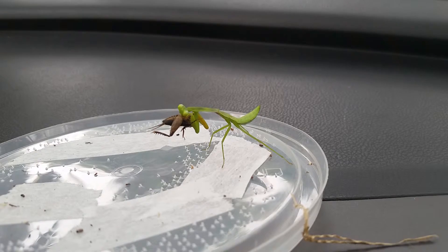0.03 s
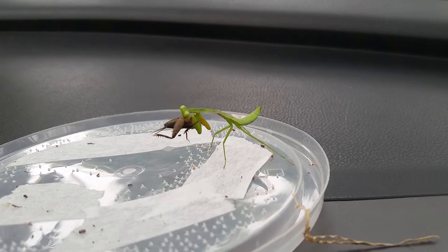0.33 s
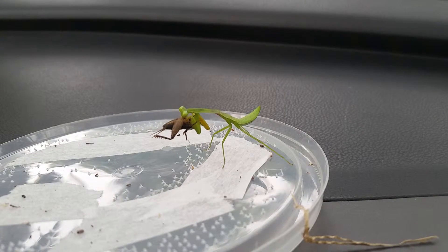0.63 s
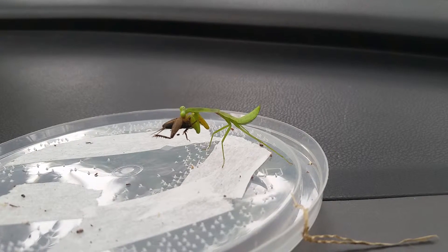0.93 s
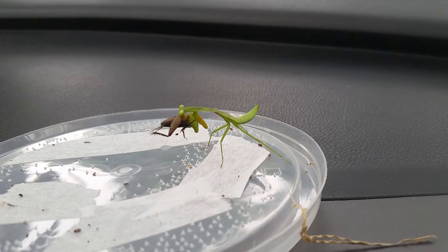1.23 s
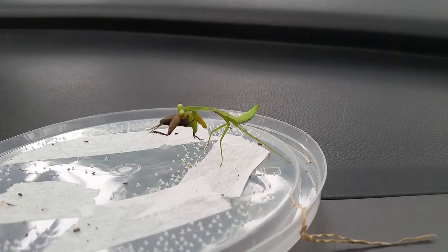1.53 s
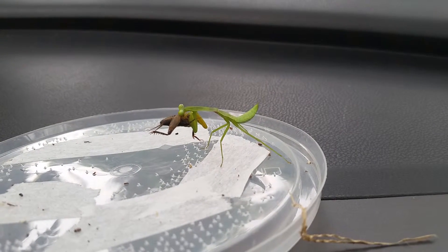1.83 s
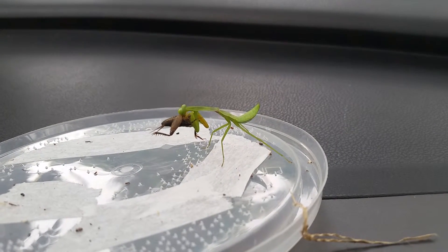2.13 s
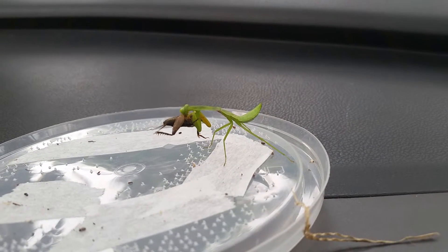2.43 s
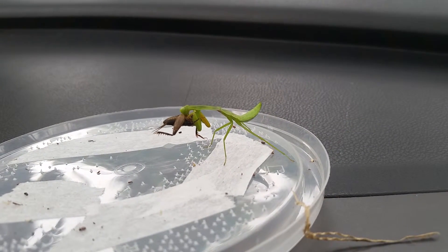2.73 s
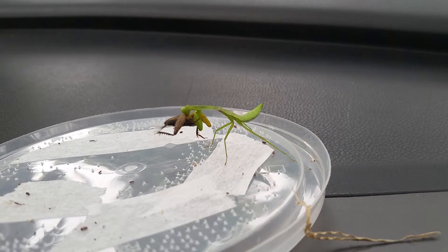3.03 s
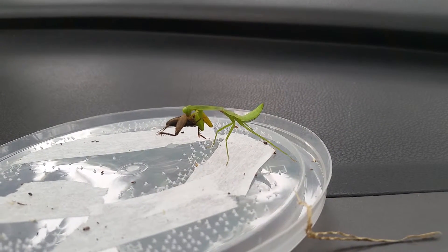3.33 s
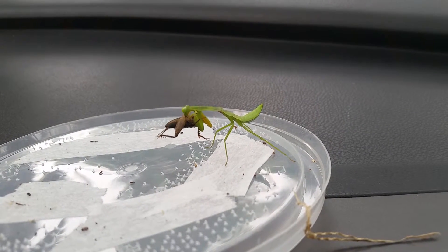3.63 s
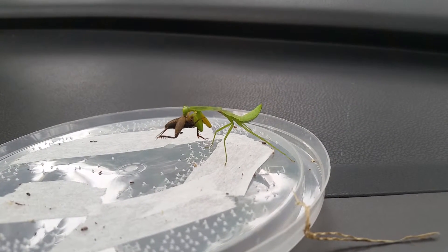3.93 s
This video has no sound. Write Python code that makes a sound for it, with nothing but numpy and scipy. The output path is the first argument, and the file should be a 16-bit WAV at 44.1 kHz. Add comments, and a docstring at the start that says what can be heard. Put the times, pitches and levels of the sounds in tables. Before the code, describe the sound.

An idling engine throbs quietly inside a parked car, with cabin rumble, a hollow drone, faint fan tones and hiss. From 0.5 seconds, dull handling bumps hit the left microphone, hardest near 1 second, while a very faint high squeak wavers until 1.2 seconds. A small dull tick comes at 1.8 seconds, then softer bumps from 2.2 to 3.2 seconds. The hum fades slowly through 4 seconds.

```python
"""Inside a parked car, the idling engine throbs and hums over cabin rumble, a hollow drone, faint fan
tones and microphone hiss. A tiny bright tick comes at once. From 0.5 s handling bumps the left
microphone, hardest near 1 s, while a thin, wavering squeak comes and goes (0.6-1.2 s). A dull tick
follows at 1.8 s, then softer bumps from 2.2 to 3.2 s, as the whole bed sinks slowly in level."""
import sys
import numpy as np
from scipy import signal
from scipy.fft import rfft, irfft
from scipy.io import wavfile
from scipy.ndimage import uniform_filter1d

SR = 44100
rng = np.random.default_rng(int(sys.argv[2]) if len(sys.argv) > 2 else 0)


def to_wav(sig):
    """Store sig (one row per channel, or 1-D mono) as 16-bit WAV at the path in sys.argv[1].

    Samples outside -1..1 are clipped; the rate is SR.
    """
    pcm = np.clip(np.atleast_2d(sig), -1, 1) * 32767
    pcm = np.round(pcm).astype(np.int16)
    wavfile.write(sys.argv[1], SR, pcm.T)  # frames by channels


N = 176400
T = np.arange(N) / SR
HZ = np.fft.rfftfreq(N, 1 / SR)
DRIFT_HZ = 2.11  # how quickly the engine and fan pitches wander


def amp(db):
    """Decibels to gain."""
    return 10 ** (np.asarray(db) / 20)


def unit(x):
    """Scales to rms 1."""
    return x / np.sqrt(np.mean(x ** 2) + 1e-30)


def pan(db):
    """Stereo gains that put the left this many dB over the right."""
    return amp(np.array([[db], [-db]]) / 2)


def ride(points):
    """A fader ride: gain through (time [s], level [dB]) points."""
    return amp(np.interp(T, *np.transpose(points)))


def wander(hz):
    """Smooth random motion of rms 1, up to about this rate."""
    return unit(irfft(rfft(rng.standard_normal(N)) * np.exp(-(HZ / hz) ** 2 / 2), N))


def noise(spectrum, likeness):
    """Stereo noise of rms 1 with this EQ curve; likeness runs from 0 (wide) to 1 (mono)."""
    hz, db = np.transpose(spectrum)
    eq = amp(np.interp(np.log(HZ + 1), np.log(hz), db))
    left, other = irfft(rfft(rng.standard_normal((2, N))) * eq, N)
    right = likeness * left + np.sqrt(1 - likeness ** 2) * other
    return unit(np.array([left, right]))


def tone(turns, flutter, flutter_hz=8.1):
    """A sine of rms 1 whose level and phase flutter."""
    wobble = 1 + flutter * (wander(flutter_hz) + 1j * wander(flutter_hz)) / np.sqrt(2)
    return unit((wobble * np.exp(2j * np.pi * (turns + rng.random()))).real)


# slow fade on the engine harmonics, fan and hiss (time [s], level [dB])
BED_FADE = [(0, -0.5), (.4, -1.94), (.7, -1.66), (1.15, -1.5), (1.5, -4), (2.05, -6.5), (2.42, -5.5),
            (2.9, -10), (3.2, -10), (3.5, -13.5), (3.75, -13), (4, -16)]
def fade(depth=1.0):
    """The slow fade as a gain; depth multiplies its decibels."""
    return ride(BED_FADE) ** depth


# throb of the deep hum (time [s], level [dB])
ENGINE_THROB = [(0, -44), (.1, -51), (.22, -55), (.35, -49.5), (.45, -54.5), (.57, -44.5), (.75, -53.5),
                (1.05, -48), (1.17, -57), (1.27, -59.5), (1.38, -59), (1.5, -51), (1.72, -53.5),
                (1.87, -62.5), (1.97, -53.5), (2.12, -58.5), (2.45, -56), (2.85, -66.5), (2.98, -53),
                (3.09, -63.5), (3.18, -55.5), (3.33, -68), (3.5, -63.5), (3.58, -68), (3.72, -54),
                (3.86, -74.5), (4, -56.5)]
# overtones (multiple of the firing rate, pre-fade level [dB], left over right [dB], flutter [0-1])
ENGINE_HARMONICS = [(3, -62.5, 2.5, .8), (4, -58, -1.5, 1), (5, -64.5, 1.5, 0.7)]
def engine(firing_hz=50.64, drift=0.008):
    """The engine throbs deeply at its firing rate; the harmonics hum in the cabin."""
    turns = np.cumsum(firing_hz * (1 + drift * wander(DRIFT_HZ))) / SR
    throb = ride(ENGINE_THROB) * pan(db=0.7) * tone(turns, flutter=0.11)
    hum = sum(amp(db) * pan(side_db) * tone(multiple * turns, flutter)
              for multiple, db, side_db, flutter in ENGINE_HARMONICS)
    return throb + fade() * hum


# fan whine (pitch [Hz], pre-fade level [dB], flutter [0-1])
FAN_TONES = [(340, -71, .6), (509.8, -74.5, .4)]
# EQ of the rushing air (frequency [Hz], relative level [dB])
AIR_EQ = [(100, -10), (300, 0), (600, -1), (800, -7.5), (1150, -11), (1500, -18), (2100, -19), (2800, -24),
          (4200, -23), (5500, -31.5), (7000, -41), (10000, -60)]
def fan(drift=0.0038):
    """Two faint tones drift together in a soft, wide rush of air."""
    drifting_time = np.cumsum(1 + drift * wander(DRIFT_HZ)) / SR
    whine = sum(amp(db) * tone(hz * drifting_time, flutter) for hz, db, flutter in FAN_TONES)
    air = amp(-66.5) * pan(db=-1) * noise(AIR_EQ, likeness=0.037)
    return fade(depth=1.5) * whine + fade(depth=1.37) * air


# EQ of the cabin rumble (frequency [Hz], relative level [dB])
RUMBLE_EQ = [(10, -19.5), (27, -12), (45, -5.5), (80, 2), (120, -6), (160, -10.5), (235, -20.5), (320, -23),
             (420, -26), (700, -42.5), (1500, -85.5)]
# fader ride of the rumble (time [s], level [dB])
RUMBLE_RIDE = [(0, -48), (.35, -49.5), (.8, -50.5), (1.15, -51.5), (1.5, -54.5), (1.9, -58.5), (2.2, -57.5),
               (2.55, -57), (2.9, -64), (3.2, -61), (3.4, -64.5), (3.72, -63), (4, -65)]
def rumble(lump_db=0.8):
    """The dull, slightly lumpy low end of the cabin, near the centre."""
    lumps = amp(lump_db * wander(hz=8))
    return ride(RUMBLE_RIDE) * lumps * pan(db=0.5) * noise(RUMBLE_EQ, likeness=0.72)


# EQ of the drone (frequency [Hz], relative level [dB])
DRONE_EQ = [(70, -23), (130, 2.5), (195, 8), (230, -3), (300, 0.5), (360, -9), (430, -19), (700, -56.5)]
# fader ride of the drone (time [s], level [dB])
DRONE_RIDE = [(0, -57), (.35, -62.5), (.8, -64.5), (1.25, -62), (1.6, -59.5), (1.9, -62.5), (2.07, -60),
              (2.3, -63.5), (2.55, -63), (2.9, -66.5), (3.2, -65.5), (3.35, -71), (3.55, -68), (4, -72.5)]
def drone():
    """Hollow low-mid noise that swells and sinks, a little to the right."""
    return ride(DRONE_RIDE) * pan(db=-3.5) * noise(DRONE_EQ, likeness=0.36)


# resonant peak of the microphone port (frequency [Hz], relative level [dB])
PORT_EQ = [(2500, -45), (3250, -21), (3600, -7), (3850, -1), (4030, .7), (4300, -6.5), (4700, -21),
           (5400, -40), (7000, -62)]
# top-end fizz (frequency [Hz], relative level [dB])
FIZZ_EQ = [(7000, -40), (9700, -26), (10700, -9), (13000, -4.5), (15500, 0), (16500, -3), (20000, -30)]
def hiss(waver_db=0.5, floor_db=-91):
    """Microphone hiss: a band at the port resonance and a bright top fade over a steady white floor."""
    port = amp(-74 + waver_db * wander(hz=8)) * pan(db=8.5) * noise(PORT_EQ, likeness=0)
    fizz = amp(-82) * pan(db=1.9) * noise(FIZZ_EQ, likeness=0)
    floor = amp(floor_db) * rng.standard_normal((2, N))
    return fade() * port + fade(depth=1.5) * fizz + floor


# one bright tick, one dull (time [s], level [dB], centre [Hz], width [octaves], decay [s])
TICK_CUES = [(.045, -73, 11500, .15, .003), (1.761, -63.5, 600, .7, .009)]
def ticks(likeness=0.31):
    """Tiny puffs of band noise with a hard attack that die at once."""
    out = np.zeros((2, N))
    for start, db, hz, octaves, decay in TICK_CUES:
        band = np.exp(-(np.log2((HZ + 1) / hz) / octaves) ** 2 / 2)
        burst = irfft(rfft(rng.standard_normal((2, N))) * band, N)
        envelope = (T >= start) * np.exp(-abs(T - start) / decay)
        out += amp(db) * envelope * unit(burst + likeness * burst[::-1])
    return out


# handling hits (time [s], thump level [dB], settled pitch [Hz], scuff level [dB])
BUMP_CUES = [(0.534, -40, 114, -53.5), (0.9882, -21, 71.6, -44.5), (1.1035, -29, 91.3, -45.5),
             (1.137, -39.5, 131, -56), (2.197, -36, 114, -64), (2.336, -29.5, 69, -57),
             (2.346, -38, 62.4, -59), (2.3636, -32, 76.3, -60), (2.539, -41, 59.5, -62),
             (2.792, -44.5, 77.5, -61.5), (3.175, -49, 58.5, -70)]
# EQ of the dull finger scuff (frequency [Hz], relative level [dB])
SCUFF_EQ = [(80, -17), (200, 8.5), (380, -3), (520, -21.5), (1000, -34), (3000, -71)]
def bumps(rise_cycles=0.58, bend=0.98, bend_s=0.0036, scuff_rise_s=0.0035, thump_right_db=-40):
    """Fingers knock the left microphone: each hit is a damped low thump with a short scuff."""
    thumps, scuff_envelope = np.zeros((2, N))
    for start, db, hz, scuff_db in BUMP_CUES:
        age = np.maximum(T - start, 0)
        rise = age * hz / rise_cycles
        envelope = (rise * np.exp(1 - rise)) ** 1.8
        # the pitch starts about an octave sharp and drops fast
        turns = hz * (age + bend * bend_s * (1 - np.exp(-age / bend_s)))
        thumps += amp(db) * envelope * np.sin(2 * np.pi * turns)
        scuff_envelope += amp(scuff_db) * age / scuff_rise_s * np.exp(1 - age / scuff_rise_s)
    scuffs = scuff_envelope * pan(db=7.5) * noise(SCUFF_EQ, likeness=0.33)
    return thumps * amp([[0], [thump_right_db]]) + scuffs


# contour of the squeak (time [s], pitch [Hz], level [dB])
SQUEAK_CONTOUR = [(0.601, 9900, -108), (.635, 10200, -95), (.665, 10400, -96), (.7, 10700, -94),
                  (.755, 11200, -97), (.81, 10800, -98), (0.871, 10230, -93), (.9, 10600, -100),
                  (.935, 10930, -91), (0.961, 10800, -99), (1.05, 10500, -103), (1.2, 10750, -108)]
def squeak(jitter_hz=45.4, roughness=0.4, ramp_s=0.01):
    """A very faint high whistle on the left that glides up and down and trails off."""
    times, hz, db = np.transpose(SQUEAK_CONTOUR)
    glide = uniform_filter1d(np.interp(T, times, hz), size=900)
    pitch = glide + jitter_hz * wander(hz=120)
    gate = np.clip(np.minimum(T - times[0], times[-1] - T) / ramp_s, 0, 1)
    envelope = gate * amp(np.interp(T, times, db)) * (1 + roughness * wander(hz=30))
    return pan(db=7) * envelope * np.sin(2 * np.pi * np.cumsum(pitch) / SR)


def scene():
    """The stereo mix: the idling bed with the small events on top."""
    bed = engine() + fan() + rumble() + drone() + hiss()
    return bed + ticks() + bumps() + squeak()


def record(dry, cutoff_hz=15750):
    """The recorder's band limit: a steep high cut."""
    high_cut = signal.firwin(801, cutoff_hz, window=("kaiser", 8), fs=SR)
    return signal.oaconvolve(dry, high_cut[None], "same")


dry = scene()
out = record(dry)
to_wav(out)
```